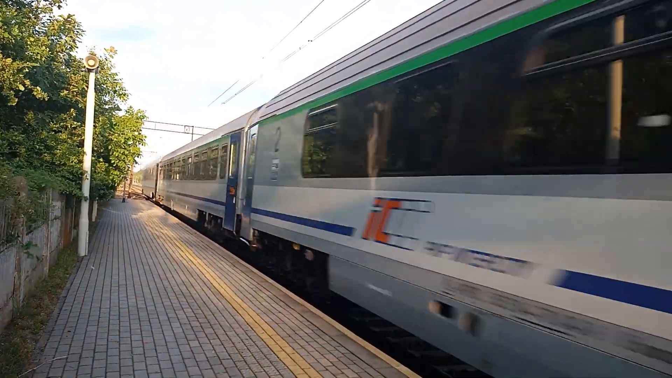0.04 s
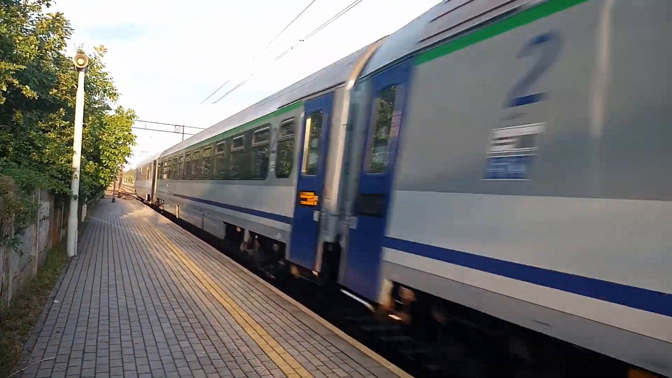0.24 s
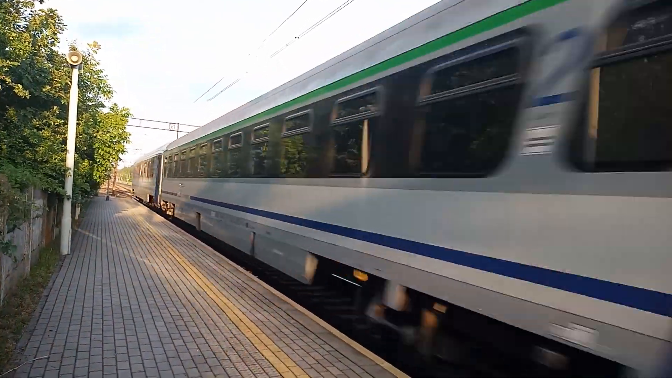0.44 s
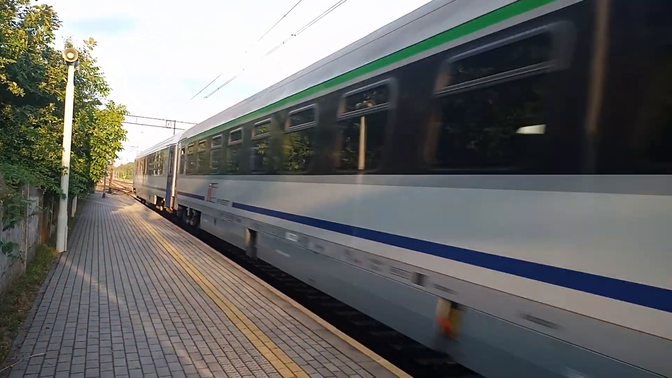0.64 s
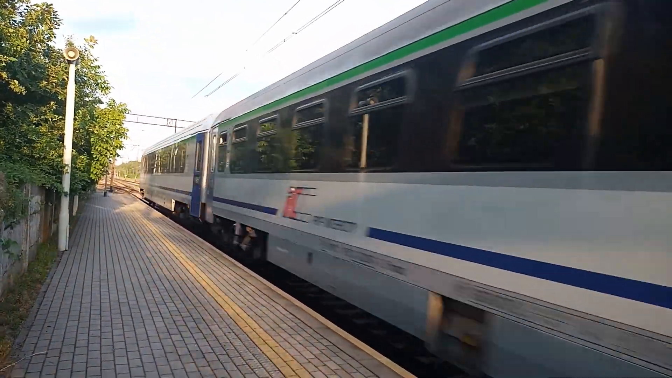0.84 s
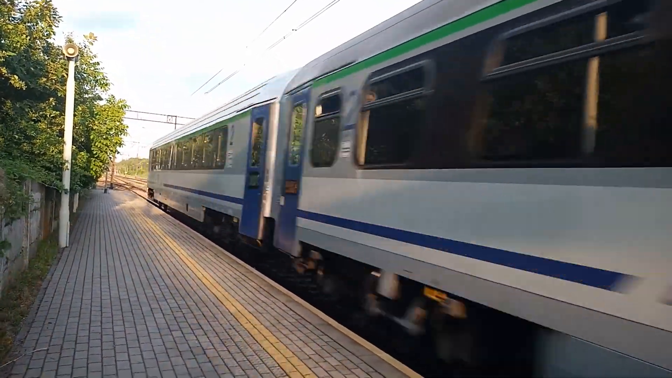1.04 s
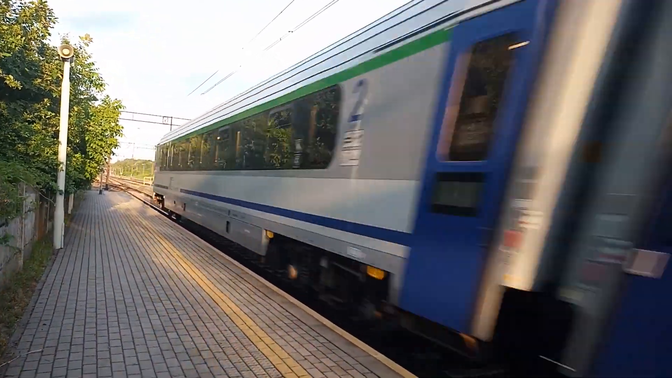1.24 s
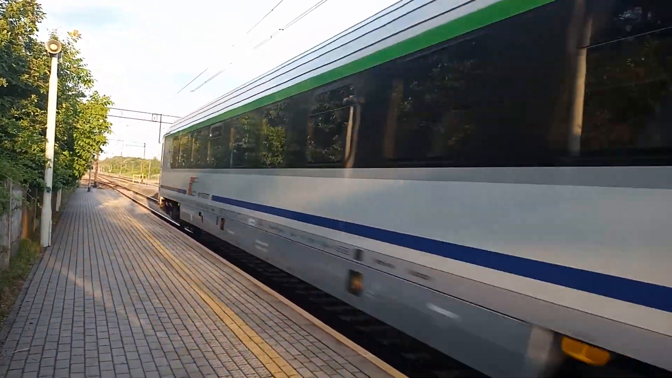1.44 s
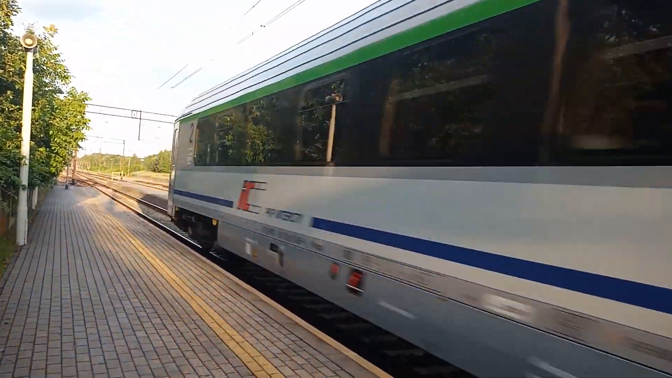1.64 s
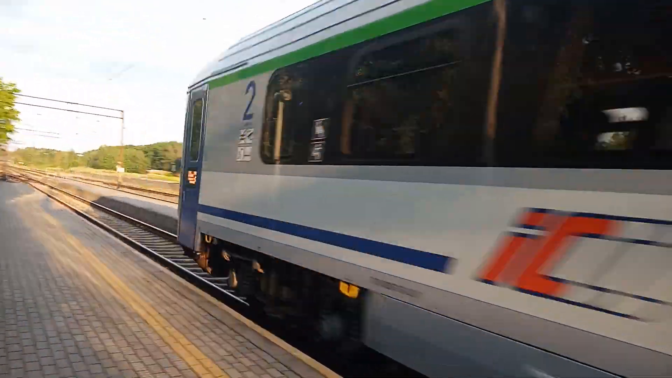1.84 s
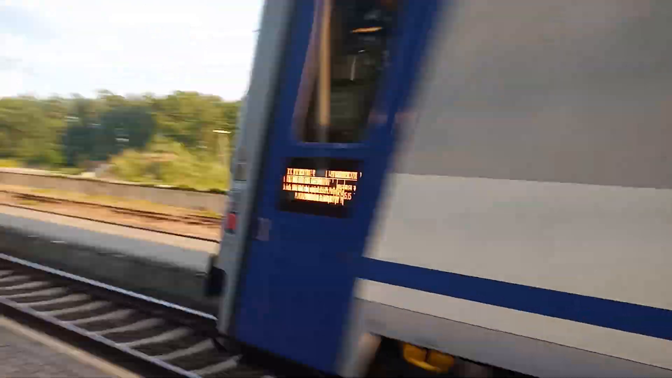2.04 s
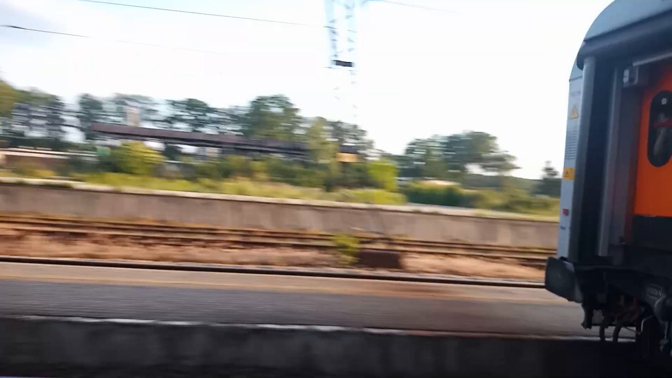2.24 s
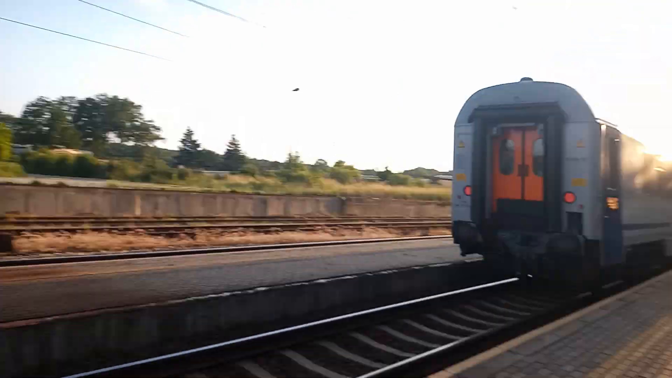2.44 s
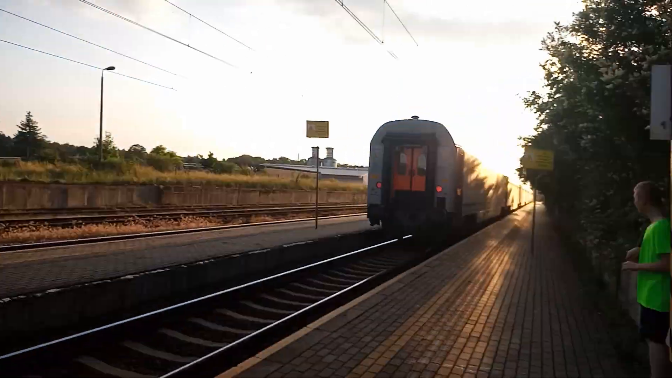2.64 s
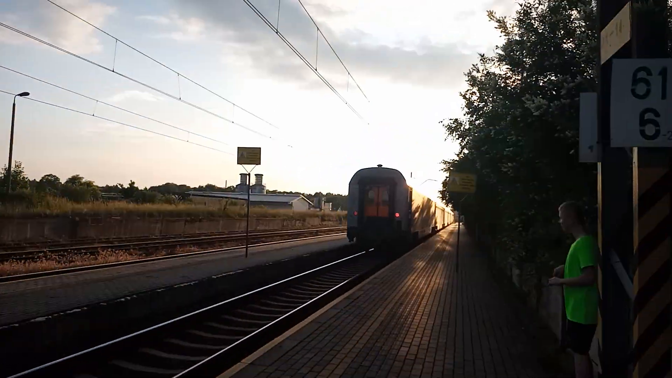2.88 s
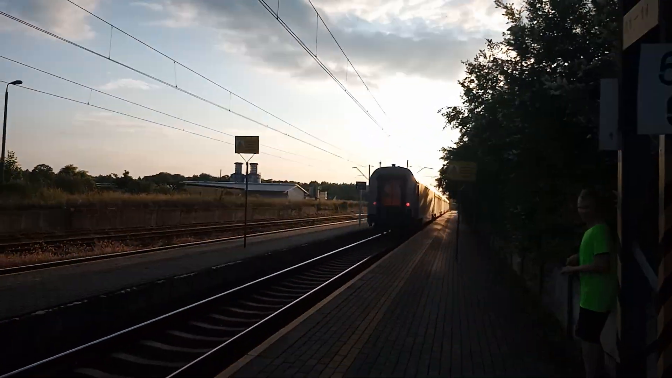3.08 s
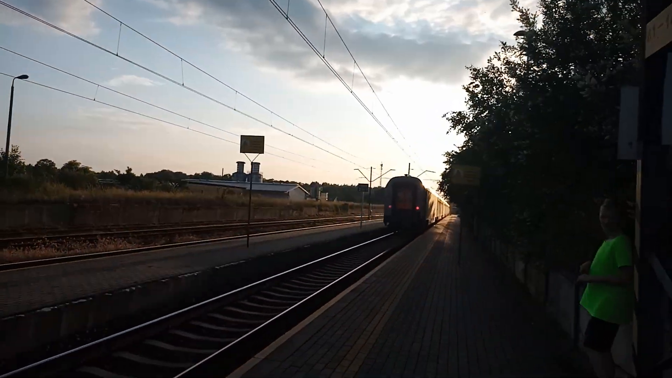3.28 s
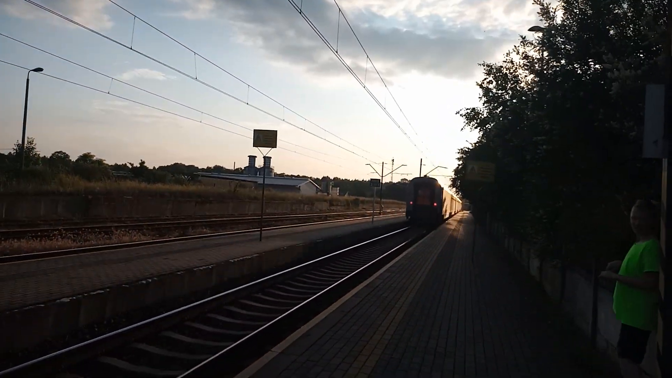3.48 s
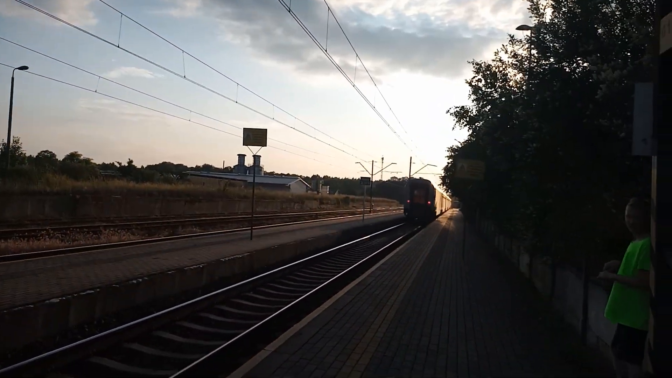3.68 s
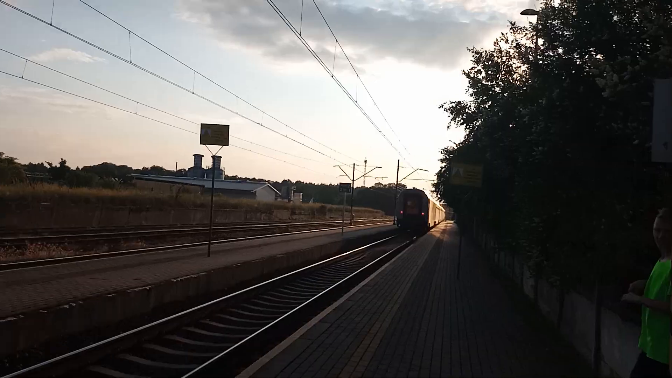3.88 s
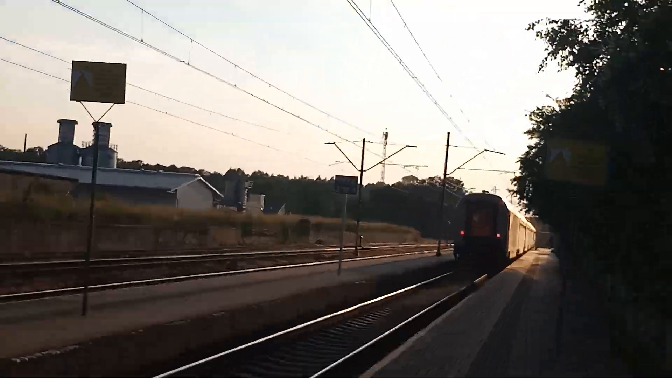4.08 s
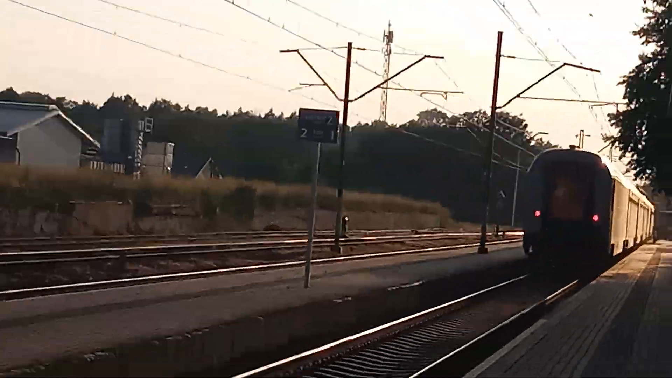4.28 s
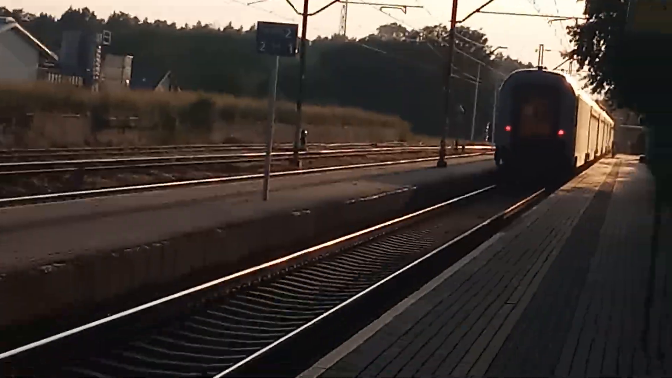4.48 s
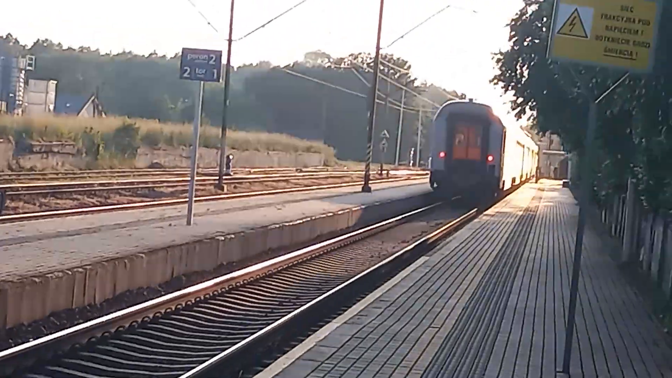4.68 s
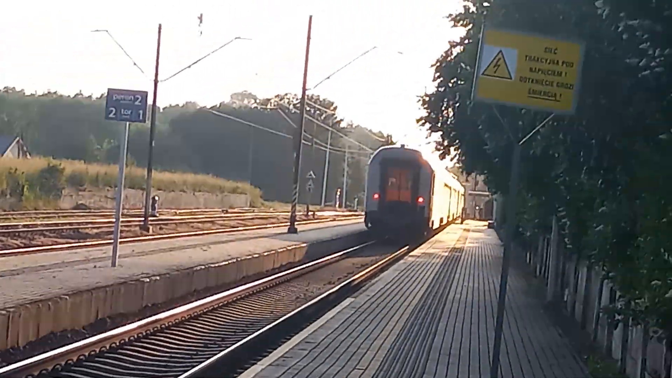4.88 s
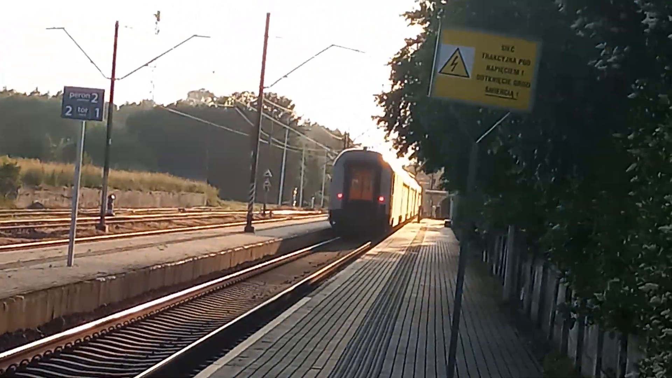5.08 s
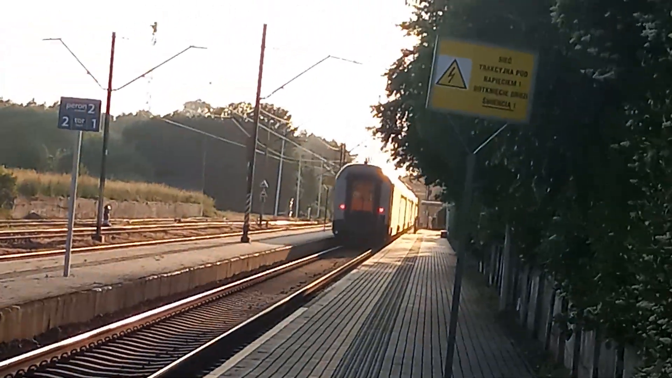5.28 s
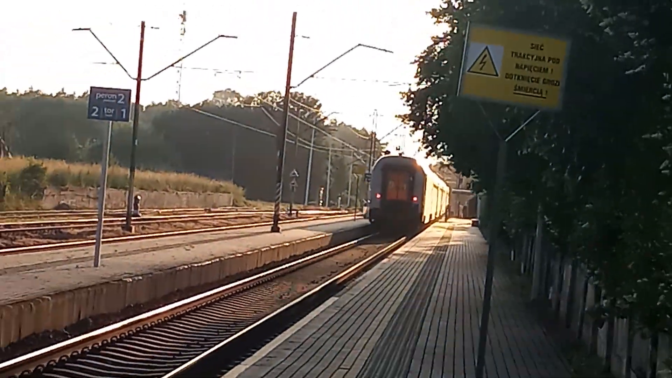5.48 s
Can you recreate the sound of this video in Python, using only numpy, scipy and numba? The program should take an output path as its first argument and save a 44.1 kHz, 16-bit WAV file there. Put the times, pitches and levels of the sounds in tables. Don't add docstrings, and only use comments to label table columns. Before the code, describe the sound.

A fast train is already passing at the start: dense mid-range roar, uneven swells of metallic wheel ringing and a faint hum under one coach. Around two seconds the tail passes with a sharp squeal, and the sound quickly drops. The distant train hums and hisses away in open air, while increasingly strong low wind thumps hit the close handheld phone.

```python
import sys
import numpy as np
from scipy import signal
from scipy.fft import rfft, irfft
from scipy.io import wavfile
from scipy.ndimage import uniform_filter1d
from numba import njit

SR = 44100
rng = np.random.default_rng(int(sys.argv[2]) if len(sys.argv) > 2 else 0)


def rack_gain(trim_db):
    fader = np.asarray(trim_db, float)
    return 10 ** (fader / 20)


def int16_out(signal):
    q = np.round(np.clip(np.atleast_2d(signal).T, -1, 1) * 32767)
    wavfile.write(sys.argv[1], SR, q.astype(np.int16))


N = 243431
TIME = np.arange(N) / SR
FREQ = np.fft.rfftfreq(N, 1 / SR) + 1

# time abreast in seconds, level in dB, distance in metres,
# brightness in dB per octave, flange squeal in dB.
BOGIES = [
    (-0.1, -19, 6.2, -25, -32),
    (0.38, -9, 3.1, -6, -25),
    (0.62, -16, 0.56, -3, -25),
    (1.3, -25.5, 5.6, 3, -22),
    (1.52, -9.5, 3.14, -3.5, -27),
    (2.081, -9.5, 5.5, -3.5, -9.5),
    (2.28, -12.5, 2.8, -7.5, -18),
]
# pitch in Hz, width in Hz, level in dB.
WHEEL_NOTES = [(898, 170, -30), (1132, 96, -11), (1436, 127, -1.3), (1968, 190, 0), (2550, 260, -5),
               (3606, 280, -10.5), (5480, 73, -16.5)]
# time in seconds, pitch in Hz, level in dB.
RAIL_NOTE = [
    (0.5, 1580, -25),
    (0.7, 1590, -27.5),
    (0.9, 1584, -30),
    (1.1, 1660, -23.5),
    (1.3, 1570, -28),
    (1.5, 1550, -16),
    (1.75, 1480, -45),
    (1.95, 1610, -37),
    (2.1, 1520, -48),
]
# time in seconds, distance in metres, rail rumble in dB,
# sleepers in dB, wheel hiss in dB.
AXLE_LOADS = [
    (-0.03, 5.2, -13.5, -34, -23),
    (0.34, 4.8, -13.5, -48, -18.5),
    (0.54, 6.6, -17, -27, -19),
    (0.89, 2.3, -32, -25, -27),
    (1.39, 3.3, -14, -38, -17),
    (1.57, 2.5, -23, -26.5, -13.5),
    (1.77, 4.7, -18, -34, -24.5),
    (2.1, 4.2, -12, -33, -13.5),
    (2.3, 2.5, -21.5, -48, -20.5),
]
# pitch in Hz, level in dB per Hz.
ROAR_COLOUR = [(40, -58), (150, -42), (210, -16.5), (300, -12.5), (410, -7), (690, 1.5), (970, 2.5),
               (1310, -4), (1640, 2), (2500, -4), (4500, -7), (5800, -15.5), (7800, -31), (15600, -62)]
# pitch in Hz, width in Hz, level in dB.
AIR_RUSH = [(8600, 3600, 0), (9870, 1240, 0.5), (11060, 1800, 1.5), (12400, 970, -2.5), (13500, 1400, -5),
            (14500, 1300, -5), (15300, 1200, -13)]
# pitch in Hz, width in Hz, level in dB.
NOTES_BEHIND = [(775, 90, 4), (1076.7, 35, 1), (1333, 91, 2.5), (1815, 45, -4)]
# start in seconds, rise in seconds, peak in dB,
# fading in dB per second.
NOTE_SWELLS = [
    (2.34, 0.53, -26, 4.5),
    (2.48, 0.81, -26, 1.5),
    (2, 1, -28, -0.5),
    (2.91, 0.46, -22.5, 1),
]
# pitch in Hz, width in Hz, level in dB.
HISS_BEHIND = [(2390, 110, 6.5), (4280, 300, 0.7), (5290, 350, -3), (6620, 880, -5), (8630, 560, -16.5),
               (11700, 530, -21)]
# time in seconds, peak in dB, half length in seconds.
GUSTS = [(0.5, -48, .15), (0.744, -39, 0.026), (1.056, -35.5, 0.25), (1.432, -31, 0.085),
         (1.756, -37, 0.054), (2.005, -29, 0.027), (2.167, -40, .04), (2.335, -43, 0.066),
         (2.47, -41, 0.026), (2.694, -50, 0.058), (2.997, -51, .03), (3.276, -44, 0.084),
         (3.37, -39, 0.036), (3.593, -49, .03), (3.683, -40, 0.034), (3.82, -33, .05), (3.92, -42, 0.031),
         (4.153, -35, 0.061), (4.26, -45, .03), (4.397, -35, 0.068), (4.583, -29.5, 0.0456),
         (4.72, -34, .04), (4.908, -22, 0.049), (5.08, -31, 0.027), (5.393, -23.5, 0.1), (5.47, -30, 0.061)]
# time in seconds, peak in dB, pitch in Hz, length in milliseconds.
BUFFETS = [(3.27, -23, 280, 12.5), (3.66, -40, 444, 5.1), (3.821, -38, 288, 8.7), (4.136, -21, 272, 13.3),
           (4.4, -22, 283, 14), (4.488, -20, 151, 7.6), (4.503, -18, 369, 9.5), (4.593, -19, 247, 11.4),
           (4.719, -30, 450, 7.2), (4.839, -18, 350, 8.5), (4.874, -13.5, 350, 13.4),
           (4.886, -12.5, 440, 7.3), (4.898, -21, 355, 11.4), (4.939, -29, 215, 8), (5.064, -23, 353, 9),
           (5.081, -16, 303, 8.4), (5.281, -21, 402, 10.3), (5.364, -17, 312, 11.3),
           (5.382, -13.5, 400, 13.5), (5.416, -11, 380, 6.5), (5.462, -13.5, 374, 6.4),
           (5.51, -17, 310, 8.7)]

SPEED_MS = 25
TAIL_S = 2.21


def unit(x):
    return x / np.sqrt(np.mean(x ** 2))


@njit
def resonator(x, hz, width):
    out, band, low = np.empty(len(x)), 0., 0.
    for i in range(len(x)):
        g = np.tan(np.pi * hz[i] / SR)
        damping = width / hz[i]
        v = (band + g * (x[i] - low)) / (1 + g * (g + damping))
        band = 2 * v - band
        low = low + 2 * g * v
        out[i] = damping * v
    return out


def walk(rate):
    hold = int(SR / rate)
    steps = np.repeat(rng.standard_normal(N // hold + 1), hold)
    return 1.4 * uniform_filter1d(uniform_filter1d(steps, hold), hold)[:N]


def swell(from_s, rise_s, peak_db, fade_db_s):
    rise = np.clip((TIME - from_s) / rise_s, 0, 1)
    fade_db = fade_db_s * np.maximum(TIME - from_s - rise_s, 0)
    return np.sin(np.pi / 2 * rise) ** 2 * rack_gain(peak_db - fade_db)


def passing(at_s, metres):
    along = SPEED_MS * (TIME - at_s)
    reach = np.hypot(along, metres)
    bend = 1 / (1 + SPEED_MS / 343 * along / reach)
    return bend, metres / reach


def ring(modes, bend, slope_db, flicker_db=-0.5, rate=9):
    out = 0
    for hz, width, db in modes:
        pitch = hz * bend
        noise = rng.standard_normal(len(bend))
        note = unit(resonator(resonator(noise, pitch, 1.78 * width), pitch, 1.78 * width))
        tilt_db = slope_db * np.log2(hz / 1450)
        out = out + rack_gain(db + tilt_db + flicker_db * walk(rate)[:len(bend)]) * note
    return out


def bogies():
    out = np.zeros(N)
    for at_s, db, metres, slope_db, squeal_db in BOGIES:
        heard = np.abs(TIME - at_s) < 1.2
        bend, near = (v[heard] for v in passing(at_s, metres))
        late_bend, late_near = (v[heard] for v in passing(at_s + 0.04, 0.75 * metres))
        squeal = late_near ** 2 * ring([(4460, 110, squeal_db)], late_bend, 0, flicker_db=1.2)
        wheels = ring(WHEEL_NOTES, bend, slope_db)
        out[heard] += rack_gain(db - 2.5) * near ** 1.82 * (wheels + squeal)
    return out


def rail():
    at_s, hz, db = np.transpose(RAIL_NOTE)
    pitch = np.interp(TIME, at_s, hz)
    level_db = np.interp(TIME, at_s, db)
    return rack_gain(level_db) * ring([(1570, 88, 3.6)], pitch / 1600, 0)


def rolling():
    gone = np.clip((TIME - TAIL_S) / 0.2 + 0.5, 0, 1)
    since = np.maximum(TIME - TAIL_S, 0)
    near = np.array([passing(at_s, metres)[1] ** 4 for at_s, metres, *_ in AXLE_LOADS])
    loads = rack_gain(np.array(AXLE_LOADS)[:, 2:].T) ** 2 @ near
    # dB alongside, dB behind the tail, fading in dB per second
    beds = [(-21, -17, 1.74), (-41, -35.5, 5), (-22, -22.5, 3)]
    bed = [rack_gain(beside_db + gone * (behind_db - beside_db) - fade_db_s * since)
           for beside_db, behind_db, fade_db_s in beds]
    alongside = rack_gain(-59) * (1 - gone)
    rush_power = rack_gain(-46) ** 2 * (loads[2] / loads[2].max()) ** 1.8
    rustle = swell(from_s=1.93, rise_s=1.4, peak_db=-52.5, fade_db_s=4)
    vent = rack_gain(-51.5) * passing(0.86, 19)[1] ** 2
    air_power = alongside ** 2 + rush_power + rustle ** 2 + vent ** 2
    return [10 * np.log10(p) for p in (*(loads + np.square(bed)), air_power)]


def roar():
    hz, colour_db = np.transpose(ROAR_COLOUR)
    noise = rfft(rng.standard_normal(N)) * rack_gain(np.interp(np.log(FREQ), np.log(hz), colour_db))
    rumble_db, sleepers_db, hiss_db, air_db = rolling()
    parts = []
    for k, (db, flicker_db) in enumerate([(sleepers_db, 2.2), (rumble_db, 0.6), (hiss_db, 0.6)]):
        share = np.interp(np.log(FREQ), np.log((300, 900, 3800)), np.eye(3)[k])
        parts.append(rack_gain(db - 2.0 + flicker_db * walk(16)) * unit(irfft(noise * share, N)))
    patchy_db = np.interp(TIME, [2.2, 3.6], [1.0, 2.6])
    rush = ring(AIR_RUSH, np.ones(N), 0, flicker_db=patchy_db, rate=40)
    air = rack_gain(air_db + 1.4 * walk(50)) * rush
    echo = np.interp(TIME, [2.4, 3.4, 5.0], [0.02, 0.4, 0.65])
    treble_band = signal.butter(2, [5300, 12000], "band", fs=SR, output="sos")
    treble = signal.sosfiltfilt(treble_band, air + parts[2])
    return sum(parts) + air + echo * np.roll(treble, 26)


def fan():
    at_s, metres, beam = 1.125, 6.5, 7
    bend, near = passing(at_s, metres)
    near_lower = passing(at_s + 0.06, metres)[1]
    turn = 2 * np.pi * np.cumsum(321 * bend * (1 + 0.004 * walk(24.2))) / SR
    upper = near ** beam * rack_gain(-26.5 + 1.5 * walk(22)) * np.sin(turn)
    lower = near_lower ** beam * rack_gain(-33 + 1.5 * walk(22)) * np.sin(0.76 * turn)
    behind = swell(from_s=2.5, rise_s=0.27, peak_db=-41, fade_db_s=90) * np.sin(2 * np.pi * 280 * TIME)
    return upper + lower + behind


def singing():
    fading = rack_gain(-12 * np.maximum(TIME - 5.1, 0))
    bend = 1 + 0.0013 * walk(2.2)
    notes = fading * sum(swell(*when) * ring([mode], bend, 0, flicker_db=1.0)
                         for mode, when in zip(NOTES_BEHIND, NOTE_SWELLS))
    hiss_gain = swell(from_s=2, rise_s=0.8, peak_db=-34.5, fade_db_s=4)
    hiss = hiss_gain * ring(HISS_BEHIND, 1 + 0.014 * walk(1.23), 0, flicker_db=1.5)
    whistle_gain = swell(from_s=4.5, rise_s=0.7, peak_db=-54.5, fade_db_s=8)
    whistle = whistle_gain * ring([(10150, 300, 0.1)], 1 + 0.004 * walk(3.0), 0, flicker_db=1.5, rate=17)
    return notes + hiss + whistle


def wake():
    gusts = rack_gain(-73) + sum(rack_gain(db) * np.exp(-np.abs(TIME - at_s) / half_s) for at_s, db, half_s in GUSTS)
    still = np.ones(N)
    flutter = resonator(rng.standard_normal(N), 200 * still, 450.0)
    flutter = unit(resonator(flutter, 230 * still, 400.0))
    out = gusts * rack_gain(-2 + 4.0 * walk(45)) * flutter
    for at_s, peak_db, hz, ms in BUFFETS:
        near = np.abs(TIME - at_s) < 0.05
        age = TIME[near] - at_s - ms / 2000
        slowing = 1 - 25 * np.clip(age, -0.02, 0.02)
        swirl = np.cos(2 * np.pi * hz * age * slowing) + 0.24 * flutter[near]
        out[near] += rack_gain(peak_db) * np.exp(-(age * 2500 / ms) ** 2) * swirl
    deep = unit(resonator(rng.standard_normal(N), 60 * still, 76.0))
    return out + (gusts + rack_gain(-65.5)) * rack_gain(-19.5 + 7.7 * walk(12)) * deep


def scene():
    return (bogies() + rail() + roar() + fan() + singing() + wake())[None]


def low_pass(x):
    return signal.sosfilt(signal.butter(12, 15640, fs=SR, output="sos"), x)


def record(dry):
    thin = signal.sosfilt(signal.butter(2, 160, "high", fs=SR, output="sos"), dry)
    full = np.clip(thin, -0.99, 0.99)
    return low_pass(full)


dry = scene()
out = record(dry)
int16_out(out)
```